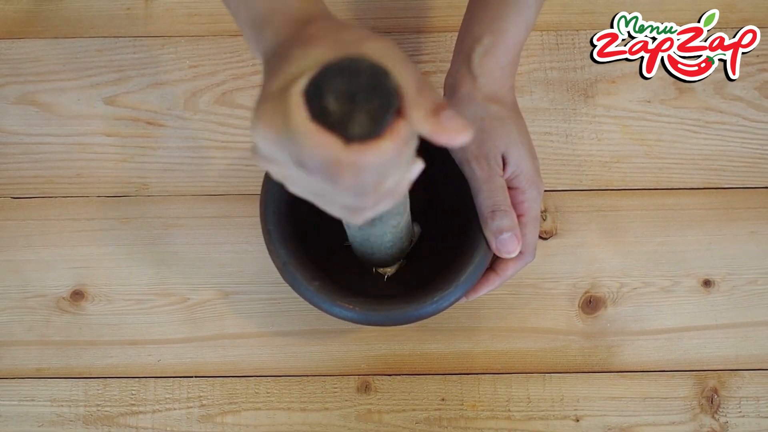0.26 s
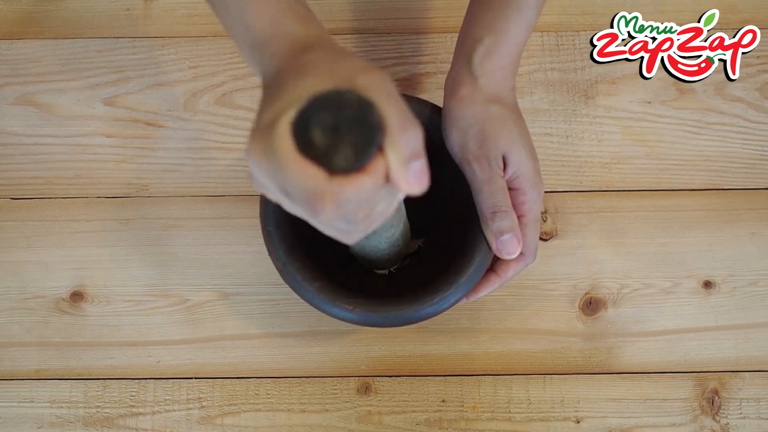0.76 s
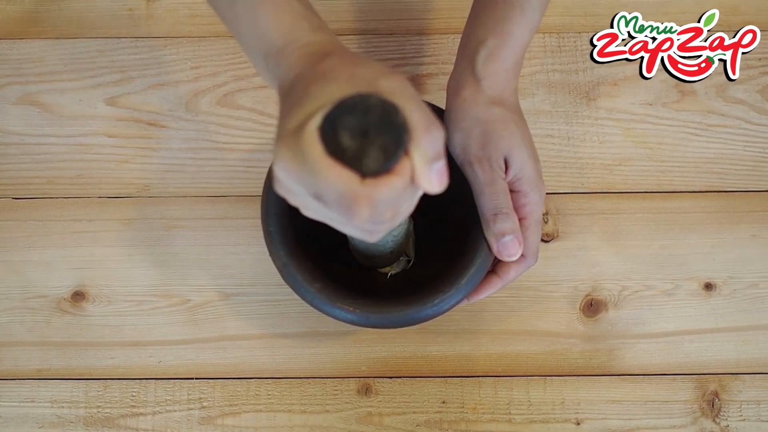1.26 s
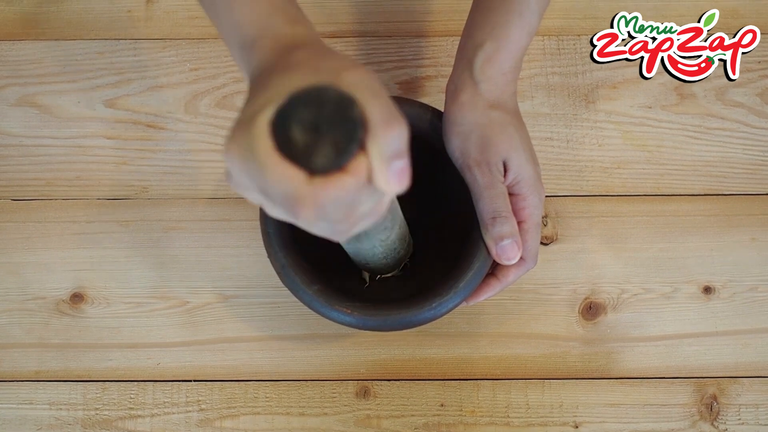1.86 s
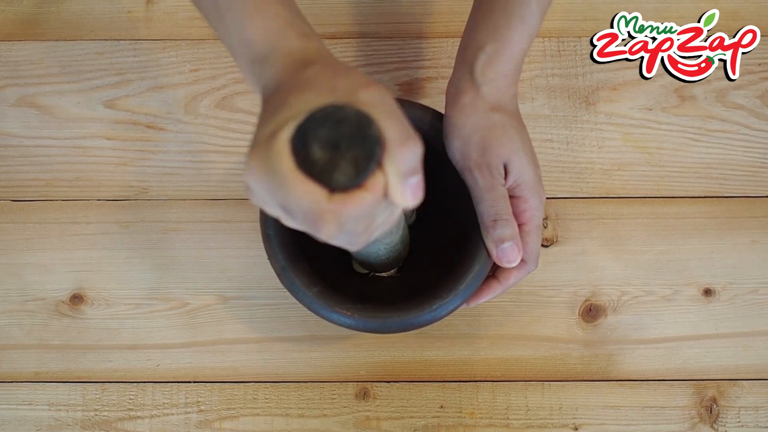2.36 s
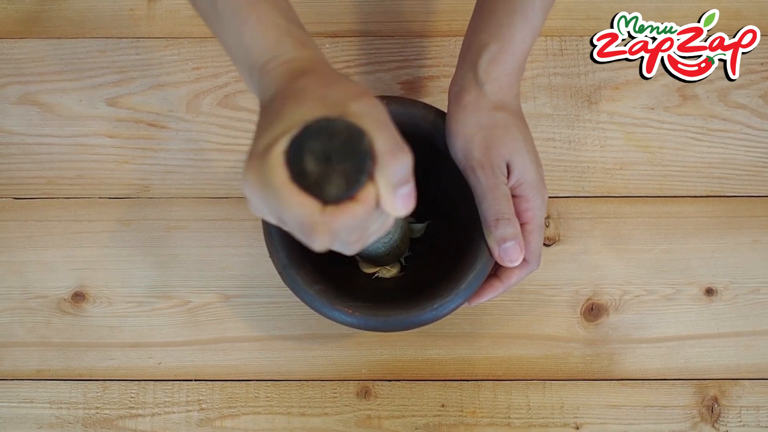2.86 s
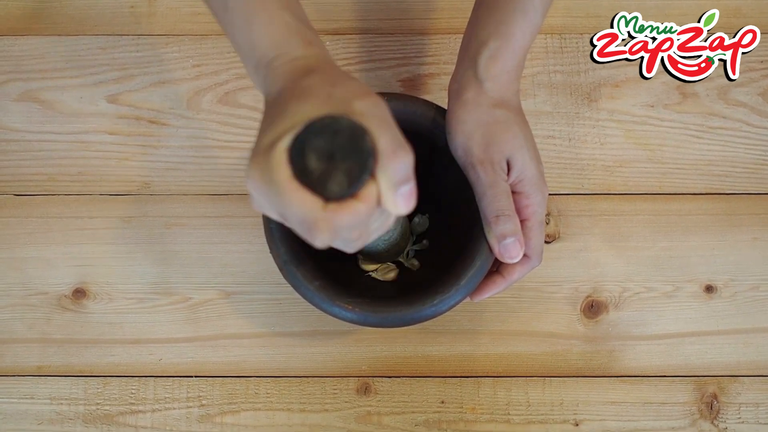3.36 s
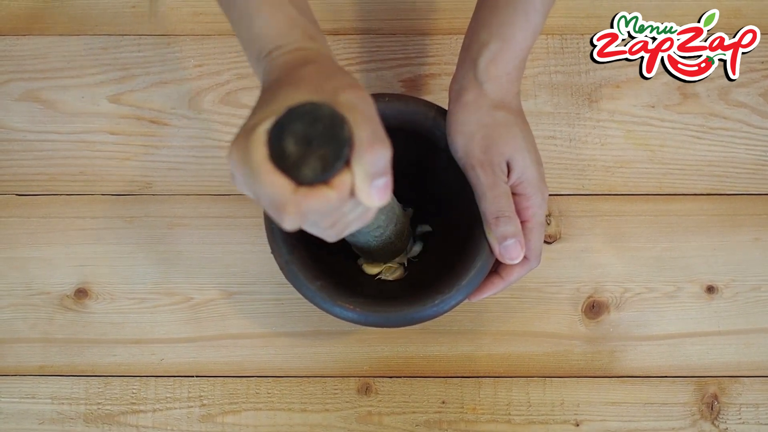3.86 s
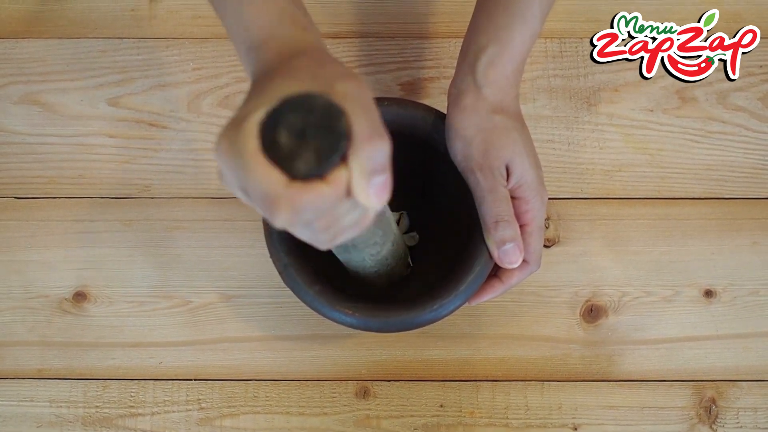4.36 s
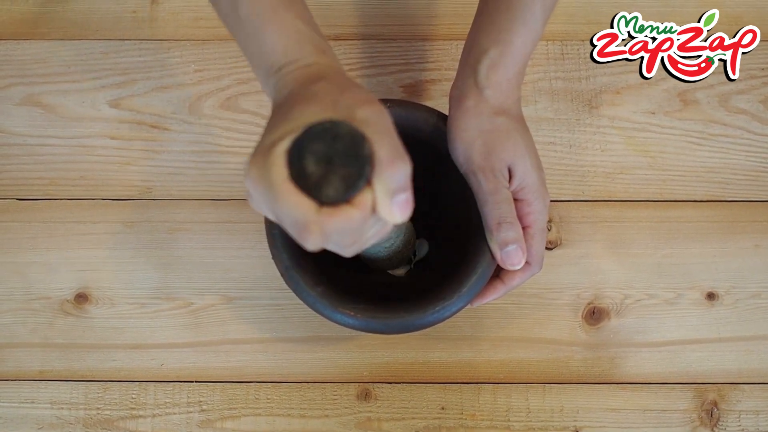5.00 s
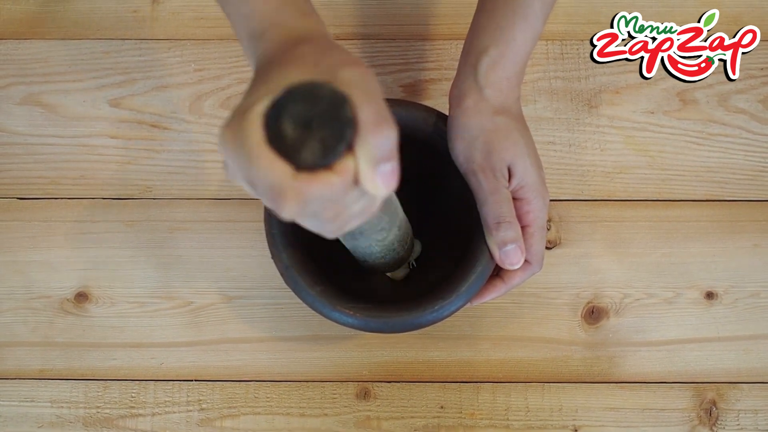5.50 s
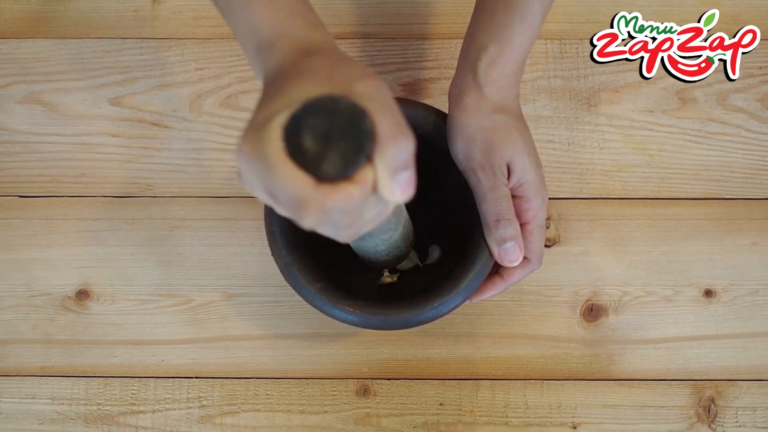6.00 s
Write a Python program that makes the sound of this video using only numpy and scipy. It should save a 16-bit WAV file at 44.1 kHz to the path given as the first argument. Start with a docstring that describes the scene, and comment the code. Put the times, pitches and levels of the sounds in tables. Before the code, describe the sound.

A stone pestle pounds garlic cloves in a mortar on a wooden table for about six seconds, in an even rhythm of between three and four blows a second. Each blow is a brief, crisp crunch running straight into a hard knock, with a low thud from the table and a faint high ring from the pestle. Dry skins crackle quietly between the blows. The knocks are a little softer around 0.7 to 1 second, and hardest at about 1.8 and 2.9 seconds. Near 4.2 and 4.5 seconds the crunches last slightly longer, and the second of these blows is clearly cushioned and quieter. Firmer knocks return from about 4.8 seconds and continue to the end, the crunch fading slightly as the garlic turns to pulp. The sound is close and in stereo, with short kitchen reverberation over a very quiet background.

```python
"""A live kitchen, where a stone pestle pounds garlic in a hand-held mortar on a wooden table.
Each blow fractures the cloves with a crunch, then strikes the bowl a few ms later; the impact excites
the damped modes of table (a thud), bowl (a knock) and pestle (a faint ring), and the room reverberates.
Dry skins crackle between the blows. A close stereo pair of small microphone ports hears it."""
import sys
import numpy as np
from scipy import signal
from scipy.fft import rfft, irfft, next_fast_len
from scipy.io import wavfile
from scipy.ndimage import uniform_filter1d

SR = 44100
rng = np.random.default_rng(int(sys.argv[2]) if len(sys.argv) > 2 else 0)


def log_audio(samples):
    """Write samples as a 16-bit WAV file to the path given in sys.argv[1]."""
    # one column per channel
    frames = np.atleast_2d(samples).T
    # limit to full scale, then quantise
    limited = np.clip(frames, -1, 1)
    pcm = np.round(limited * 32767).astype(np.int16)
    wavfile.write(sys.argv[1], SR, pcm)


N = 275184
SIZE = 32768  # samples in one event
T = np.arange(SIZE) / SR


def amp(db):
    """The decibel law: level to amplitude ratio."""
    return 10 ** (np.asarray(db) / 20)


def unit(x):
    """Normalisation to a mean energy of 1 a channel."""
    return x / np.sqrt(np.mean(np.sum(x ** 2, -1)) + 1e-20)


def curve(points, hz):
    """Linear interpolation on a log-frequency axis."""
    f, value = np.transpose(points)
    return np.interp(np.log(hz + 1), np.log(f), value)


def fade(t, t60):
    """Exponential decay, by 60 dB in t60."""
    return np.exp(-np.log(1000) * t / t60)


def add(mix, s, sound):
    """Superposition: a sound joins the mix at time s, cut to fit."""
    start = round(s * SR)
    sound = sound[..., max(-start, 0):]
    part = mix[:, max(start, 0):][:, :sound.shape[-1]]
    part += sound[..., :part.shape[1]]


def convolve(x, response):
    """Convolution with an impulse response, cut to the input's length."""
    return signal.fftconvolve(np.atleast_2d(x), response, axes=1)[:, :x.shape[-1]]


def colour(x, spectrum):
    """Minimum-phase filtering to a spectral shape, with an energy gain of 1."""
    log_gain = np.log(amp(curve(spectrum, abs(np.fft.fftfreq(2048, 1 / SR)))))
    taps = np.fft.ifft(np.exp(np.conj(signal.hilbert(log_gain)))).real
    return convolve(x, unit(taps)[None])


def diffuse(size, t60s=None, port_gap_m=0.076):
    """A diffuse field: noise whose coherence at two ports follows a sinc law; it may decay by band."""
    hz, t, (mid, side) = signal.stft(rng.standard_normal((2, size)), SR, nperseg=512)
    coherence = np.sinc(2 * hz * port_gap_m / 343)[:, None]
    mid, side = mid * np.sqrt(1 + coherence), side * np.sqrt(1 - coherence)
    bands = np.array([mid + side, mid - side])
    if t60s is not None:
        bands = bands * fade(t, curve(t60s, hz)[:, None])
    return signal.istft(bands, SR, nperseg=512)[1][:, :size]


def room(build_s=0.007):
    """Reverberation: the kitchen's impulse response builds up, then decays band by band."""
    # reverberation time: f/Hz, t60/s
    decay_times = [(150, 1.63), (400, 0.5), (1000, 0.54), (2000, 0.5859), (4000, 0.51), (8000, .5),
                   (15000, 0.5)]
    # reverberant spectrum: f/Hz, level/dB
    spectrum = [(100, -19.5), (400, 2.5), (900, -1), (2000, -5.5), (4000, 1.5), (8000, 3.5), (15000, 3.5)]
    build_up = 1 - np.exp(-(T / build_s) ** 2)
    return unit(colour(diffuse(SIZE, decay_times) * build_up, spectrum))


def reflections(t, delays_s=(.0015, .0075, .014), step_db=-3, smear_s=0.0026):
    """Early reflections, smeared by scattering, from bowl wall, hand and nearby surfaces."""
    envelope = sum(amp(step_db * k) * (t > delay) * np.exp(-abs(t - delay) / smear_s)
                   for k, delay in enumerate(delays_s))
    return unit(diffuse(SIZE) * envelope)


def ring(modes, detune=0.00666, scatter_db=3):
    """Free vibration of damped modes; striking point and grip shift each a little."""
    hz, db, t60 = np.transpose(modes)[:, :, None]
    shift, strength = rng.standard_normal((2, len(modes), 1))
    sign = (-1) ** np.arange(len(modes))[:, None]
    tones = np.sin(2 * np.pi * hz * (1 + detune * shift) * T)
    return np.sum(sign * amp(db + scatter_db * strength) * fade(T, t60) * tones, 0)


def snaps(envelope, per_s, spread_db):
    """Acoustic emission: tiny fractures form a Poisson train of impulses of random size."""
    size = amp(spread_db * np.minimum(rng.exponential(1, SIZE), 4)) * rng.choice([-1, 1], SIZE)
    return unit(envelope * size * (rng.random(SIZE) < per_s / SR))


def crunch(squash_s, sheen_db, onset_s, rise_s=0.0017, fall_s=0.0039, right_db=3.0):
    """Fracture under load: cells burst as the pestle sinks in from onset_s, a few early, a few late."""
    # spectrum of bursting garlic: f/Hz, level/dB
    spectrum = [(200, -7.5), (900, -13), (2000, -12), (2800, -12), (3600, 2), (4600, 0), (6000, -1),
                (7200, 3), (9000, -4), (12000, -6), (13500, 0.5), (16000, -5.5)]
    t = T - onset_s
    early = amp(-11) * np.exp(np.minimum(t, 0) / rise_s)
    pressure = 1.4 + .5 * t / squash_s  # mounts until the clove gives way
    late = amp(-17) * np.exp(-np.maximum(t - squash_s, 0) / fall_s)
    envelope = np.select([t < 0, t < squash_s], [early, pressure], late)
    bursts = snaps(envelope, per_s=12000, spread_db=3.0)
    split_s = squash_s * rng.uniform(.25, .9)
    split = amp(-6) * unit(np.exp(-((t - split_s) * 16000) ** 2))  # the clove parts with one snap
    direct = (bursts + split) * amp(right_db * np.array([[-.5], [.5]]))
    # the bursts scatter differently in every direction, so their echoes return as smooth noise
    nearby = amp(-4.5) * reflections(t - squash_s / 2)
    reverb = amp(-9) * np.roll(room(), round((onset_s + squash_s / 2) * SR), 1)
    with_sheen = [(hz, db + sheen_db * (hz > 8000)) for hz, db in spectrum]
    return np.sqrt(squash_s * SR) * colour(direct + nearby + reverb, with_sheen)


def thud(knock_db, rock_db, thud_db, thud_hz, rise_s=0.0013, flex_s=0.00374):
    """Modal response: the push sways the table, then flexes its boards and rocks the bowl on them."""
    # modes of the table with the bowl on it: f/Hz, level/dB, t60/s, first swing (+1 up, -1 down)
    table_modes = [(52.4, -22.5, 0.47, 1), (74.7, -31.5, 0.25, -1), (83.7, -38, 1, -1), (114, -21, 0.44, 1),
                   (139.84, -26, 0.78, -1), (145.8, -19.5, 0.2, -1), (167.9, -22.5, 0.41, -1),
                   (187, -34.5, 0.85, -1), (196.4, -21, 0.31, 1), (287.8, -18, 0.3, 1),
                   (322.4, -5, 0.13, -1), (368.6, -23, 0.23, 1), (396, -18, 0.23, -1)]
    hz, db, t60, swing = np.transpose(table_modes)[:, :, None]
    sway_db = 0.29 * knock_db
    boards_db = thud_db - 59.5 * np.log2(hz / thud_hz) ** 2  # strongest near the pitch of the push
    push_db = np.select([hz < 90, hz < 240], [sway_db, boards_db], rock_db)
    hz = hz * (1 + 0.018 * rng.standard_normal(hz.shape))  # the changing grip loads the modes
    t = np.maximum(T - flex_s * (hz > 90), 0)
    modes = swing * amp(db + push_db) * fade(t, t60) * np.sin(2 * np.pi * hz * t)
    return np.sum(modes * (1 - np.exp(-(t / rise_s) ** 2)), 0)


def clack(t60=0.09, rise_s=0.00071, width=0.15):
    """Modal overlap: the dense, quickly damped vibration of stone on the bowl merges into noise."""
    noise = rng.standard_normal(SIZE) + width * diffuse(SIZE)
    return unit(noise * fade(T, t60) * (1 - np.exp(-T / rise_s)))


def knock(knock_db, kitchen, alike=0.55, cutoff_hz=3200):
    """Impact: stone excites the bowl's modes and the room, which answers partly alike each time."""
    # spectrum of the impact: f/Hz, level/dB
    spectrum = [(150, -8), (300, -2.5), (470, -6), (630, -4), (800, 1), (1050, 2.5), (1600, 5), (2100, 1.5),
                (2600, -5), (3500, -4.5), (5000, -15), (8000, -26), (16000, -66)]
    # modes of the bowl, damped by the hand: f/Hz, level/dB, t60/s
    bowl_modes = [(496, -29.5, 0.2), (820, -33.5, 0.53), (936, -45, 1), (1020, -29, 0.44),
                  (1085, -22, 0.28), (1271, -35.5, 0.1), (1392, -34, 0.12), (1485, -32, 0.62),
                  (1530, -28, 0.4), (1814, -21, 0.19), (2182, -30.5, 0.33), (2833, -19, 0.023)]
    reverb = np.sqrt(alike) * kitchen + np.sqrt(1 - alike) * room()
    impact = colour(amp(10) * clack() + amp(14) * reverb, spectrum)
    bowl = amp(-5) * ring(bowl_modes)
    pole = np.exp(-2 * np.pi * cutoff_hz * amp(-0.2 * knock_db) / SR)  # louder is slightly duller
    return amp(knock_db) * signal.lfilter([1 - pole], [1, -pole], impact + bowl)


def pestle(ring_db, knock_db, flutter=.9, flutter_s=.008):
    """Free vibration of the stone shaft, with a rough flutter; hard contact favours the upper modes."""
    # modes of the pestle: f/Hz, level/dB, t60/s
    shaft_modes = [(3245, -39, 0.45), (3368, -29.5, 0.28), (3412, -32, 0.55), (5790, -37.5, 0.13),
                   (5850, -47, 0.33)]
    tilt_db_per_octave, lowest_hz = 1.7 * knock_db, shaft_modes[0][0]
    modes = [(hz, db + tilt_db_per_octave * np.log2(hz / lowest_hz), t60) for hz, db, t60 in shaft_modes]
    wobble = uniform_filter1d(rng.standard_normal(SIZE), round(flutter_s * SR))
    modulation = (1 + flutter * wobble / wobble.std()) / np.hypot(1, flutter)
    tone = ring(modes, detune=0.00094, scatter_db=1) * modulation
    direct = tone * np.array([[-.5], [1.3]])  # its flanks reach the two ports in antiphase
    return amp(ring_db) * (direct + amp(-5) * convolve(tone, room()))


def pounding(usual_squash_s=0.007, pulping_db_per_s=-0.49, push_lead_s=0.0026, onset_s=.012):
    """Cushioned impacts: thicker garlic crunches earlier, longer and more gently before each knock."""
    # blows: knock t/s, squash time/s, knock level/dB, thud level/dB, thud f/Hz, pestle ring level/dB
    blows = [(-0.16, 0.0035, 8.5, 7, 153, -1), (0.127, 0.0028, 3, -1.5, 133, 0.5),
             (0.4256, 0.0084, 0, 7.5, 139, 3.5), (0.701, 0.01, -3, -1, 133, -12.5),
             (0.971, 0.0094, -4, 0.5, 159, -5), (1.241, 0.0049, 3.5, 1.5, 142, 4.5),
             (1.505, .0037, 3.5, 1.5, 153, 3), (1.771, 0.0038, 7, 5.5, 143, 7),
             (2.052, 0.0048, -0.5, -5, 153, -3), (2.321, .0075, 3, 0, 138, -1),
             (2.583, 0.0046, 3, 0.5, 151, 0), (2.859, 0.0057, 5, 4, 135, 2.5),
             (3.127, 0.0081, -1.5, 4, 160, -11), (3.4037, 0.0054, 4, 1.5, 139, 2),
             (3.678, 0.0054, .5, 1.5, 174, -6), (3.944, .0072, -2.5, 3, 169, -11),
             (4.221, 0.017, -3, 2, 141, 0), (4.495, 0.024, -11.5, 1, 120, -13),
             (4.779, 0.0042, 0, -3.5, 139, 2.5), (5.073, 0.0073, 1, -3.5, 170, -2),
             (5.360, 0.0049, 0, -7, 146, -4), (5.639, 0.0094, 1, 1, 166, -6),
             (5.924, 0.0097, 2.5, 4, 154, -5), (6.194, 0.0042, -2, 4.5, 163, -1)]
    mix, kitchen = np.zeros((2, N)), room()
    for s, squash_s, knock_db, thud_db, thud_hz, ring_db in blows:
        doublings = np.log2(squash_s / usual_squash_s)
        lead_s = 0.0047 + 0.4 * squash_s
        crunch_db = -17.5 - 3 * doublings + pulping_db_per_s * s  # fades as the cloves turn to pulp
        sheen_db = 1.74 - 0.23 * knock_db  # hard blows land on wet flesh, soft ones on dry skin
        # thick garlic lessens the bowl's rocking, and the steadying hand limits it
        rock_db = min(-13 + 1.7 * knock_db - 0.5 * doublings, -10)
        add(mix, s - lead_s - onset_s, amp(crunch_db) * crunch(squash_s, sheen_db, onset_s))
        add(mix, s - push_lead_s, thud(knock_db, rock_db, thud_db, thud_hz))
        add(mix, s, knock(knock_db, kitchen) + pestle(ring_db, knock_db))
    return mix


def skins(gain_db=11, strays_per_s=9, swell_s=0.0012):
    """Crackling noise: papery skins emit clusters of snaps; sticky pulp adds fainter ones at random."""
    # skins and bits of clove shifting as the pestle lifts: t/s, relative level/dB, decay time/s
    clusters = [(0.066, -21, 0.021), (0.275, -24, 0.0039), (0.628, -20, 0.05), (1.12, -20, 0.034),
                (1.154, -16, 0.01), (1.980, -30, .006), (2.239, -24.5, 0.03), (2.473, -20, 0.023),
                (3.347, -26, 0.024), (4.022, -38, 0.0056), (4.688, -25, 0.03), (4.881, -24, .009)]
    # spectrum of dry skin: f/Hz, level/dB
    spectrum = [(500, -24), (2500, -11), (4000, -7), (7500, -1.5), (10000, -3.5), (13800, 1), (16000, 2.5)]
    mix, count = np.zeros((2, N)), round(strays_per_s * N / SR)
    strays = [(when * N / SR, -30 - 8 * depth, .012) for when, depth in rng.random((count, 2))]
    for s, db, decay_s in list(clusters) + strays:
        envelope = np.exp(-T / decay_s) * (1 - np.exp(-T / swell_s))
        crackle = snaps(envelope, per_s=9000, spread_db=5.5)
        flake_spectrum = [(hz, level + 3 * rng.standard_normal()) for hz, level in spectrum]
        add(mix, s, amp(db + gain_db) * colour(crackle, flake_spectrum))
    return mix + amp(-6.5) * convolve(mix, room())


def hush(level_db=-58):
    """Ambient noise: the steady diffuse field of the quiet kitchen."""
    # background spectrum: f/Hz, level/dB
    spectrum = [(20, -20), (55, -5), (140, 4), (300, -8), (1000, -6), (4000, -37), (16000, -70)]
    return amp(level_db) * np.sqrt(N) * unit(colour(diffuse(N), spectrum))


def scene():
    """Superposition of blows, skins and background at the two ports."""
    return pounding() + skins() + hush()


def record(dry, band_limit_hz=16000):
    """Resonance: each port lifts the treble and loses deep bass; peaks clip, then the band is limited."""
    # microphone ports, left and right: resonance f/Hz, Q, bass roll-off f/Hz
    ports = [(9260, 2.14, 22.7), (14960, 2.03, 27.7)]
    size = next_fast_len(N + SIZE)
    jf = 1j * np.fft.rfftfreq(size, 1 / SR)
    response = np.array([(jf / (jf + low_hz)) ** 2 / (1 + (jf / hz) ** 2 + jf / (hz * q))
                         for hz, q, low_hz in ports])
    heard = irfft(rfft(dry, size) * response, size)[:, :N]
    low_pass = signal.firwin(511, band_limit_hz, window=("kaiser", 9), fs=SR)
    return signal.oaconvolve(np.clip(heard, -1, 1), low_pass[None], "same")


dry = scene()
out = record(dry)
log_audio(out)
```